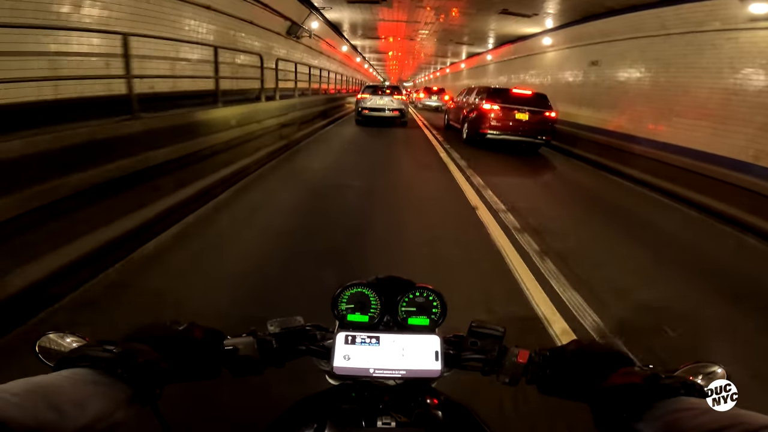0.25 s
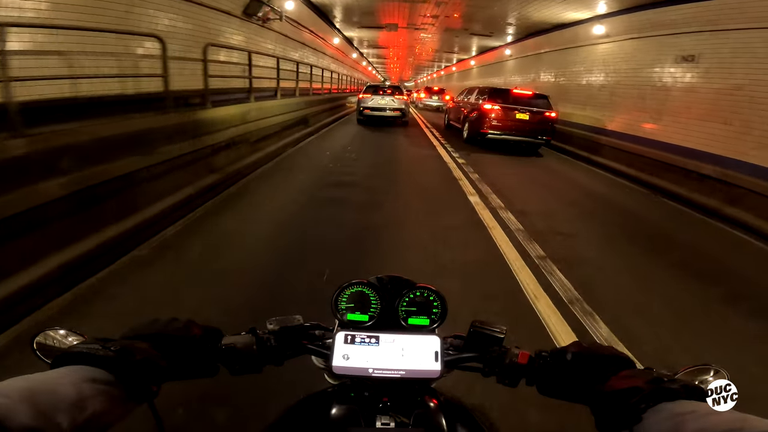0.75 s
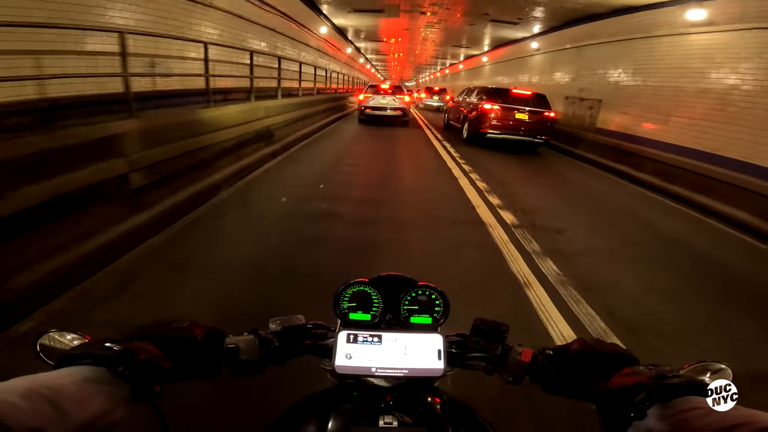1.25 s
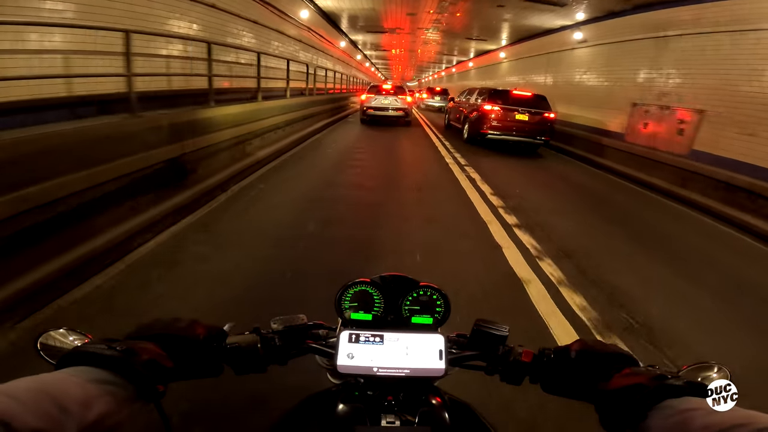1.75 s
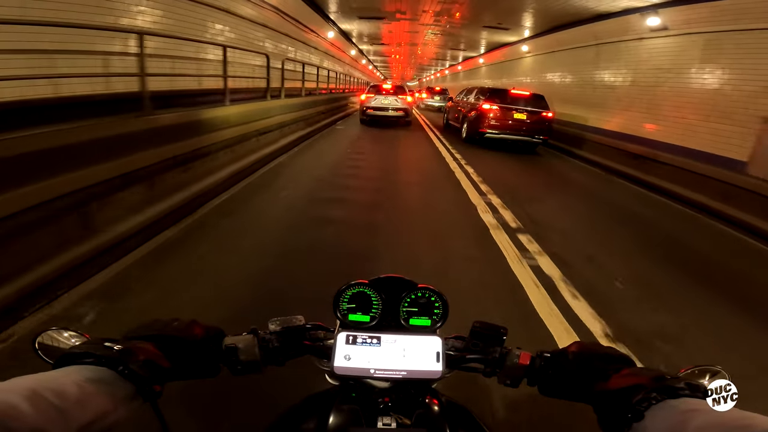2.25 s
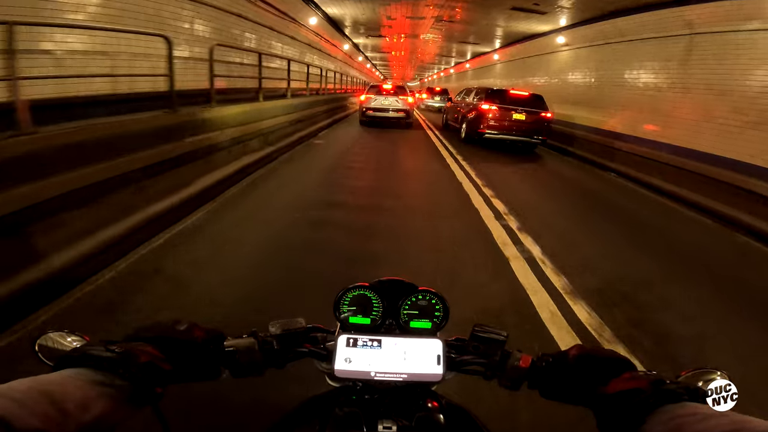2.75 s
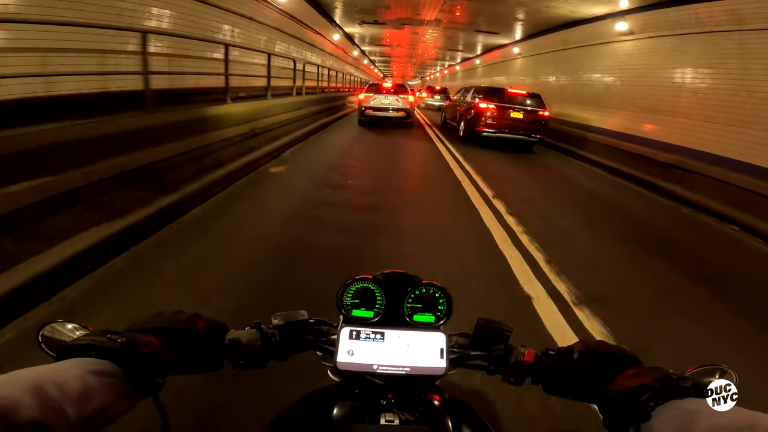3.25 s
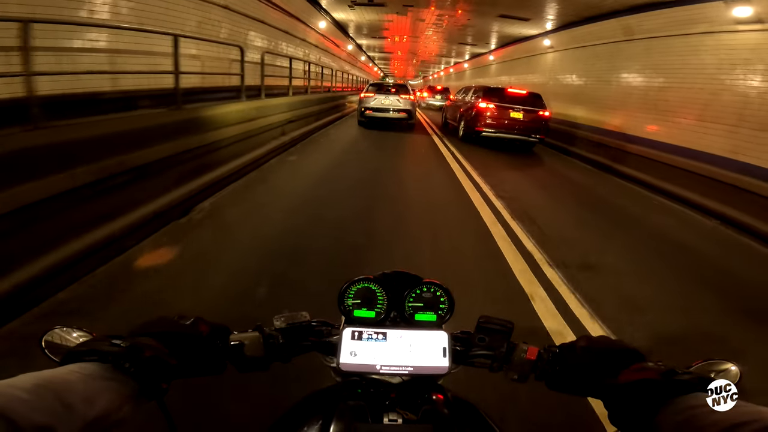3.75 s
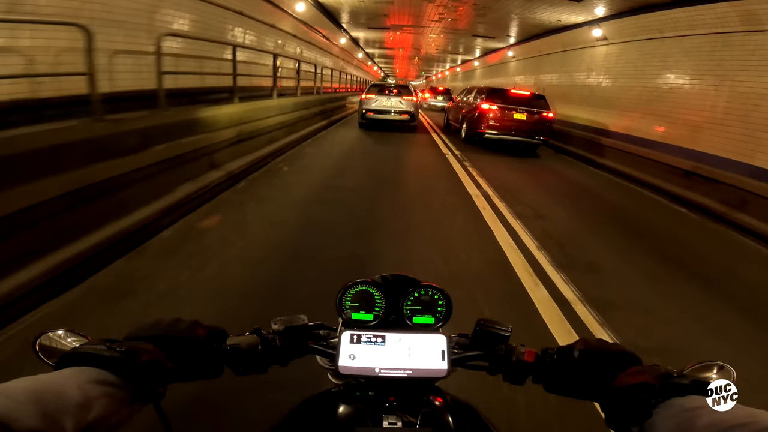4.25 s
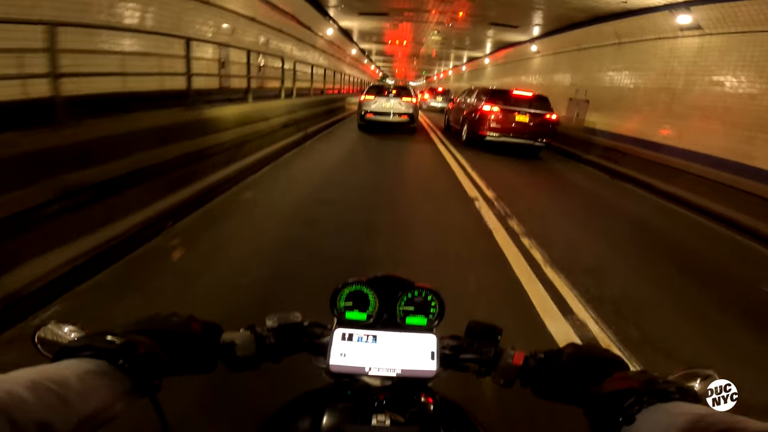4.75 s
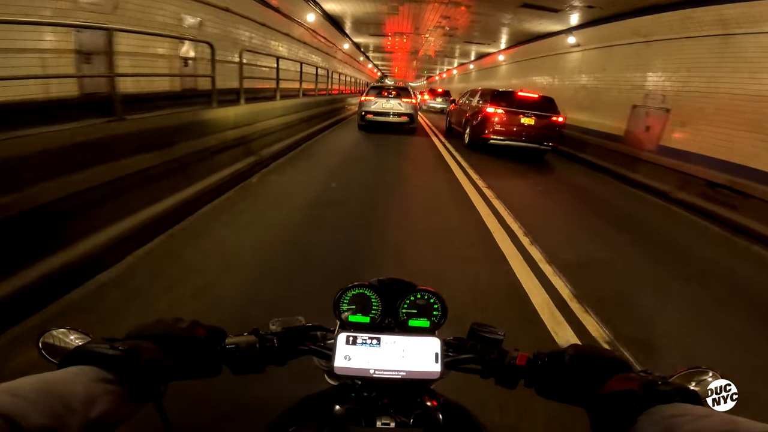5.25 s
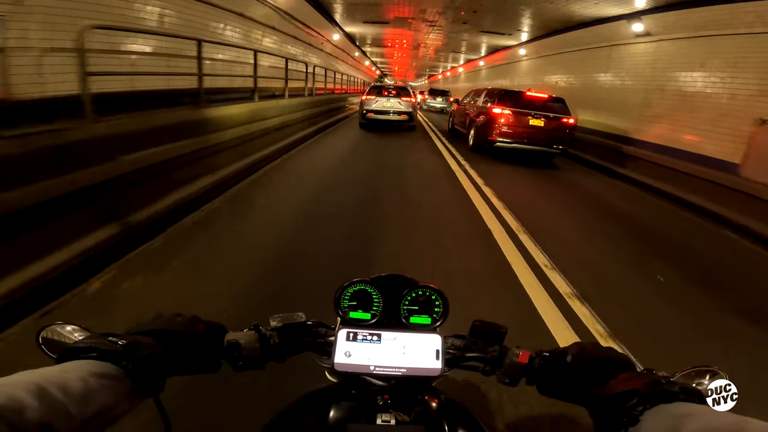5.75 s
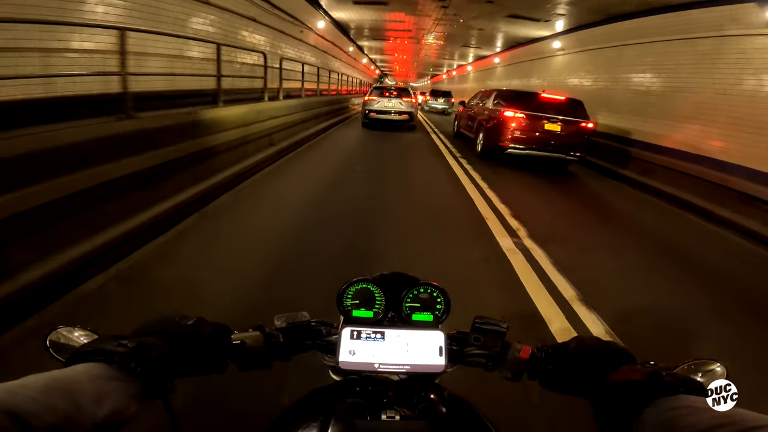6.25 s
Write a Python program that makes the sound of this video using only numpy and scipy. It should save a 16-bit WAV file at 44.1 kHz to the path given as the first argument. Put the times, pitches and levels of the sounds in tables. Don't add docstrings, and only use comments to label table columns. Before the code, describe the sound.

A twin-cylinder motorcycle drones deep and uneven through a booming tiled tunnel at steady cruise, then the throttle opens and the engine pulls harder at the end.

```python
import sys
import numpy as np
from scipy import signal
from scipy.io import wavfile
from scipy.ndimage import uniform_filter1d

SR = 44100
rng = np.random.default_rng(int(sys.argv[2]) if len(sys.argv) > 2 else 0)


def log_audio(samples):
    frames = np.atleast_2d(samples).T
    limited = np.clip(frames, -1, 1)
    pcm = np.round(limited * 32767).astype(np.int16)
    wavfile.write(sys.argv[1], SR, pcm)


def ratio_of_db(decibels):
    return 10 ** (np.asarray(decibels, float) / 20)


N = 287091
TIME = np.arange(N) / SR

# (time [s], speed [cycles/s])
ENGINE_SPEED = [(0, 19.6), (.7, 19.6), (1.3, 20.0), (2.5, 20.05), (3.6, 19.93), (4.4, 19.63), (5.2, 19.48),
                (5.75, 19.75), (5.95, 20.25), (6.22, 21.2), (6.51, 22.2)]
# (time [s], opening [0-1])
THROTTLE_OPENING = [
    (0, 0),
    (5.7, 0),
    (5.83, .55),
    (6.0, .65),
    (6.14, 1),
    (6.51, 1),
]
# (multiple of the cycle rate [-], level [dB])
CRUISE_TONES = [(1, -43), (2, -31), (3, -27.5), (5, -27.5), (6, -29.5), (7, -33.5), (9, -37), (10, -39),
                (12, -42), (13, -43)]
# (multiple of the cycle rate [-], level [dB])
PULL_TONES = [(1, -47), (2, -33.5), (3, -38), (5, -18), (6, -19), (7, -27), (9, -42), (10, -27.5),
              (12, -34), (13, -32.5)]
# (time [s], level [dB])
CRANK_SHAKE = [(0.0, -16), (0.18, -23), (1.25, -20), (1.75, -36), (3.0, -35), (3.75, -37), (4.0, -20),
               (4.3, -23), (5.5, -22), (5.75, -18), (6.0, -21), (6.25, -19), (6.4, -24), (6.51, -26)]
# (start [s], length [s], level [dB])
TUNNEL_SWELLS = [(-0.1, 0.16, -14), (0.11, .3, -19.5), (0.446, 0.23, -22), (0.654, 0.24, -20),
                 (0.892, 0.32, -20), (1.293, .49, -17.5), (1.871, 0.33, -16), (2.216, 0.17, -20),
                 (2.454, 0.24, -19), (2.746, 0.19, -15.5), (2.983, 0.066, -20), (3.134, 0.653, -19.5),
                 (3.855, 0.764, -20), (4.59, .3, -28.5), (4.94, 0.2, -17.5), (5.29, .4, -17.5),
                 (5.677, 0.36, -17), (6.004, .18, -14.5), (6.175, .15, -15), (6.332, 0.7, -20)]
# (pitch [Hz], width [Hz], level [dB])
PIPE_RINGS = [
    [(89.26, 4.3, 11), (65.3, 2.7, -14.5)],
    [(129.84, 21, 2), (111.1, 14, -1.5), (151.7, 9.9, -5)],
    [(189, 4.3, -1), (247.5, 9.2, -0.5), (306.8, 10, -8), (329.6, 25.5, 3), (285.2, 25, -7),
     (375.4, 18.4, -0.5), (452.2, 9.2, -6)],
]
# (cruise level [dB], change at open throttle [dB],
# speed effect [dB per cycle/s], drift [dB/s], revving effect [dB per cycle/s])
RAGGED_LEVELS = [
    (-21, -5, -3, -0.6, 3.5),
    (-21, -7.5, 5, -0.11, -2.5),
    (-33.5, 3.5, 4.5, 0.16, -6),
]
# (pitch [Hz], level [dB per Hz])
HISS_COLOUR = [(1120, -31), (1900, -5), (2020, -8.5), (2610, 0.5), (3190, -5.5), (3460, -3.5), (4420, -8),
               (6870, -4), (8630, -12), (11200, -12), (15600, -35.5)]
# (pitch [Hz], level [dB per Hz])
ROAR_COLOUR = [(100, -42.5), (170, -4.5), (210, -12.5), (334, -12), (575, -23), (946, -21.5), (1190, -28),
               (2030, -46.5), (2400, -48.5), (3120, -81), (5280, -120)]
# (pitch [Hz], level [dB per Hz])
RUMBLE_COLOUR = [(12, -10), (20, -11), (29, -3.5), (50, -4), (72, 11), (120, 3.5), (165, -7), (185, -14.5),
                 (230, -31), (320, -110)]
# (time [s], level [dB], half length [s])
WIND_GUSTS = [(0.597, -31.5, 0.36), (2.396, -27.5, 0.25), (2.974, -21.5, .15), (3.592, -25, 0.2),
              (4.05, -32, 0.13), (4.722, -21, .12), (5.08, -22, 0.16), (5.85, -23, .3)]
# (time [s], pitch [Hz], level [dB])
BRAKE_SQUEAL = [
    (5.22, 10200, -95),
    (5.28, 10250, -72),
    (5.36, 10400, -71),
    (5.44, 10500, -74),
    (5.52, 10900, -79),
    (5.78, 11100, -76),
    (5.92, 10800, -95),
]

SECOND_FIRING = 3 / 8
REV_SPEED = 21.0


def engine_tones(cycles, throttle):
    ease_db = 5.0
    shake_db, = curves(CRANK_SHAKE)
    speed, = curves(ENGINE_SPEED)
    out = -np.sqrt(2) * ratio_of_db(shake_db) * np.cos(2 * np.pi * 4 * cycles)
    easing_db = ease_db * np.maximum(speed - REV_SPEED - 0.5, 0)
    for (multiple, cruise_db), (_, pull_db) in zip(CRUISE_TONES, PULL_TONES):
        pair_phase = np.angle(1 + 1.06 * np.exp(-2j * np.pi * multiple * SECOND_FIRING))
        level_db = cruise_db + throttle ** 2 * (pull_db - cruise_db) - easing_db
        level_db = level_db + 2.6 * (1 - throttle / 2) * drift(3)
        phase = 2 * np.pi * multiple * cycles + pair_phase + 0.5 * drift(3)
        out -= np.sqrt(2) * ratio_of_db(level_db) * np.cos(phase)
    return out


def tunnel_drone():
    tunnel_hz, pitch_follow = 158.6, 0.55
    swell_shape, quiet_db = 0.65, -34
    level = ratio_of_db(quiet_db)
    for start, length, db in TUNNEL_SWELLS:
        arch = np.sin(np.pi * np.clip((TIME - start) / length, 0, 1)).clip(0)
        level = level + ratio_of_db(db) * arch ** swell_shape
    speed, = curves(ENGINE_SPEED)
    hz = tunnel_hz + pitch_follow * (8 * speed - tunnel_hz)
    wavering_hz = hz + 0.33 * drift(8)
    return np.sqrt(2) * level * np.sin(2 * np.pi * np.cumsum(wavering_hz) / SR)


def ragged_exhaust(cycles, throttle):
    cruise_speed, speed_span = 19.8, 0.35
    beats = evened(firings(cycles))
    blows = evened(beats * rng.standard_normal(N))
    blows = blows + 0.35 * rng.standard_normal(N)
    speed, = curves(ENGINE_SPEED)
    pace = np.clip(speed - cruise_speed, -speed_span, speed_span)
    revs = np.maximum(speed - REV_SPEED, 0)
    out = np.zeros(N)
    for rings, levels, even in zip(PIPE_RINGS, RAGGED_LEVELS, (0, 0, 1.6)):
        cruise_db, open_db, pace_db, fade_db, rev_db = levels
        drive = blows + even * (0.15 + throttle) * beats
        ringing = np.zeros(N)
        for k, (hz, width, db) in enumerate(rings):
            ringing += (-1) ** k * ratio_of_db(db) * evened(resonate(drive, hz, width))
        level_db = cruise_db + open_db * throttle + pace_db * pace + fade_db * TIME + rev_db * revs
        out += ratio_of_db(level_db) * steadied(evened(ringing), 0.74)
    return out


def valve_hiss(cycles, throttle):
    puffs = signal.lfilter([1], [1, -np.exp(-1 / (0.008 * SR))], firings(cycles))
    level_db = -54 + 1.4 * throttle + 0.5 * drift(2.3)
    return ratio_of_db(level_db) * evened(wash(HISS_COLOUR, 0.89, size=512) * (1 + 0.13 * puffs))


def traffic(throttle):
    roar_db = -29 + 0.5 + 0.72 * throttle + 0.28 * drift(4.9)
    rumble_db = -20.5 - 4.3 * throttle
    roar = ratio_of_db(roar_db) * wash(ROAR_COLOUR, 0.47, size=2048)
    return roar + ratio_of_db(rumble_db) * wash(RUMBLE_COLOUR, 2.2, size=8192)


def wind_buffet():
    calm_db = -39
    power = ratio_of_db(2 * calm_db)
    for time, db, half in WIND_GUSTS:
        power = power + ratio_of_db(2 * db) * np.exp(-((TIME - time) / half) ** 2)
    pushes = evened(resonate(rng.standard_normal(N), 9, 14))
    return np.sqrt(power) * steadied(pushes, 0.8)


def brake_squeal():
    hz, level_db = curves(BRAKE_SQUEAL)
    return ratio_of_db(level_db) * evened(resonate(rng.standard_normal(N), hz, 260))


def firings(cycles):
    marks = np.zeros(N)
    for lag in (0, SECOND_FIRING):
        count = np.floor(cycles - lag)
        marks += np.diff(count, prepend=count[0])
    return marks


def resonate(x, hz, width):
    turn = np.exp(2j * np.pi * np.cumsum(hz * np.ones(N)) / SR)
    r = np.exp(-np.pi * width / SR)
    smooth = signal.lfilter([(1 - r) ** 2], [1, -2 * r, r * r], x / turn)
    return 2 * (turn * smooth).real


def wash(spectrum, patchy_db, size):
    hop = size // 4
    hz = np.fft.rfftfreq(size, 1 / SR)
    a, b, patches = rng.standard_normal((N // hop + 5, len(hz), 3)).T
    patches = uniform_filter1d(patches, size=12, axis=0)
    patches = evened(uniform_filter1d(patches, size=10, axis=1))
    f, level_db = np.transpose(spectrum)
    colour_db = np.interp(np.log(hz + 1), np.log(f + 1), level_db, left=-90)
    z = (a + 1j * b) * ratio_of_db(colour_db[:, None] + patchy_db * patches)
    return evened(signal.istft(z, nperseg=size, noverlap=size - hop)[1][:N])


def drift(fastest_hz):
    t = TIME[::256]
    slow = np.zeros(len(t))
    for f in fastest_hz * np.geomspace(1 / 20, 1, 24):
        slow += np.sin(2 * np.pi * (f * t + rng.random())) / np.sqrt(f)
    return np.interp(TIME, t, evened(slow))


def steadied(x, share):
    power = uniform_filter1d(x ** 2, size=SR // 8)
    return evened(x / (power + 1e-9) ** (share / 2))


def evened(x):
    return x / np.sqrt(np.mean(x ** 2) + 1e-20)


def curves(rows):
    s, *columns = np.transpose(rows)
    return [np.interp(TIME, s, c) for c in columns]


def scene():
    speed, = curves(ENGINE_SPEED)
    opening, = curves(THROTTLE_OPENING)
    cycles = np.cumsum(speed) / SR
    throttle = np.clip(opening, 0, 1.2)
    engine = engine_tones(cycles, throttle) + tunnel_drone()
    engine = engine + ragged_exhaust(cycles, throttle) + valve_hiss(cycles, throttle)
    return (engine + traffic(throttle) + wind_buffet() + brake_squeal())[None]


def low_pass(x):
    return signal.sosfilt(signal.butter(12, 15710, fs=SR, output="sos"), x)


def record(dry):
    ceiling = 2.4
    fade_in = np.clip(0.2 + TIME / 0.004, 0, 1)
    heard = (dry + ratio_of_db(-76) * rng.standard_normal(N)) * fade_in
    return low_pass(ceiling * np.tanh(heard / ceiling))


dry = scene()
out = record(dry)
log_audio(out)
```